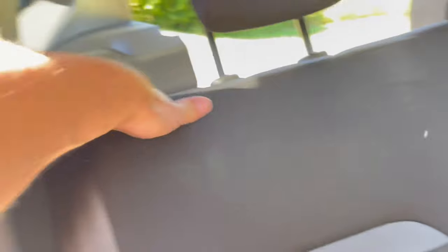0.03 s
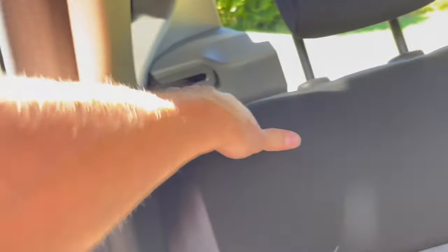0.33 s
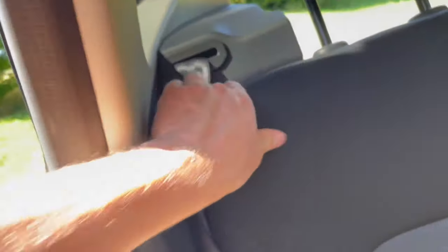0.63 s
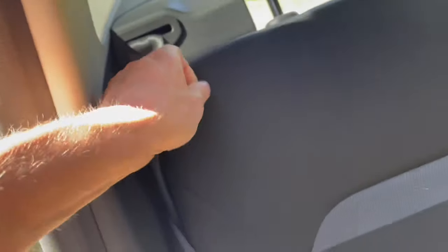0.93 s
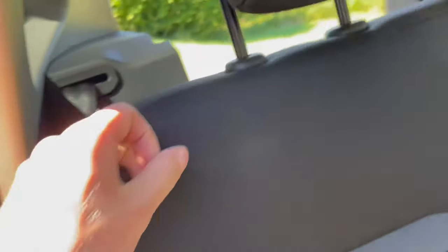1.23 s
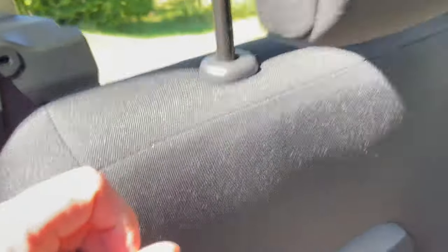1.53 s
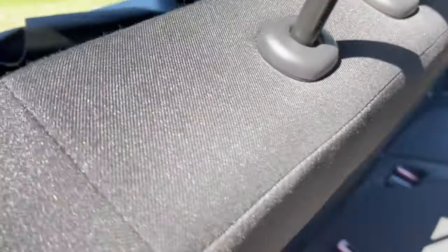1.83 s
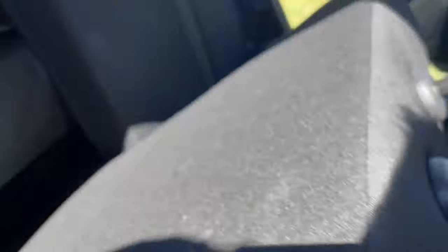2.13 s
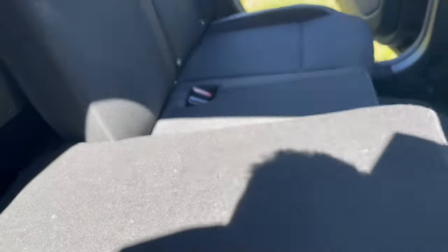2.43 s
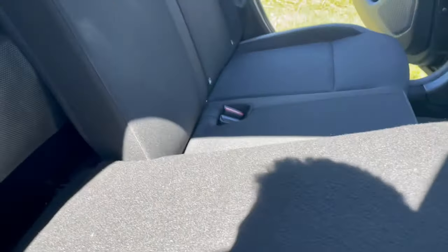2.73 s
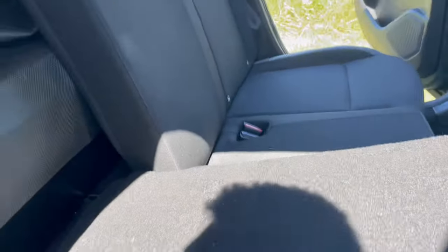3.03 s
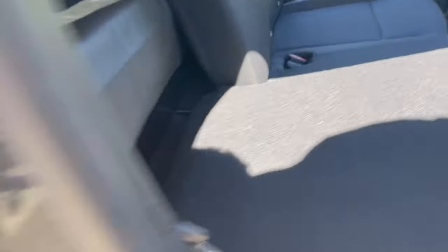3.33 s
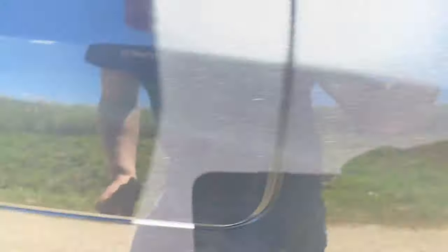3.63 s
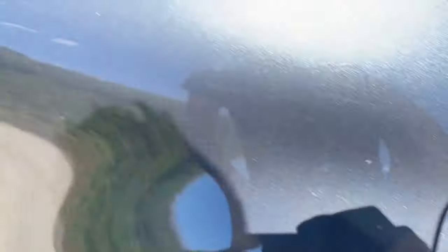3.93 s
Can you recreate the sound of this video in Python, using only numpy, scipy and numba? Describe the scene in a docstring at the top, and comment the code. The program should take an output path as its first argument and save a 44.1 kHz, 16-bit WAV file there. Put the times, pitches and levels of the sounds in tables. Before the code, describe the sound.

A car's rear seat folds down: a latch snaps open, the upholstery rubs and thuds, and the backrest lands with a plastic clack. The idling engine booms low in the cabin, and wind finally buffets the hand-held microphone.

```python
"""Rear seat folding in an idling car.

Engine firings boom in the cabin, heard from a hand-held phone. The latch snaps open, a hand and the
upholstery rub, and the backrest judders forward by stick-slip, thuds and lands with a plastic clack.
The phone moves out of the cabin: the boom fades, with small knocks and wind on the microphone."""
import sys
import numpy as np
from scipy import signal
from scipy.fft import rfft, irfft
from scipy.io import wavfile
from scipy.ndimage import uniform_filter1d
from numba import njit

SR = 44100
rng = np.random.default_rng(int(sys.argv[2]) if len(sys.argv) > 2 else 0)


def put_to_file(sound):
    """Save the sound as 16-bit audio at rate SR, in the file named by the first command-line argument."""
    columns = np.atleast_2d(sound).T  # one column per channel
    safe = np.clip(columns, -1, 1)
    whole_steps = np.round(safe * 32767)
    wavfile.write(sys.argv[1], SR, whole_steps.astype(np.int16))


N = 176400
RING_SAMPLES = 16384
TIME_S, RING_TIME_S = np.arange(N) / SR, np.arange(RING_SAMPLES) / SR


def undb(db):
    """dB to amplitude."""
    return 10 ** (np.asarray(db) / 20)


def unit(x):
    """Scale to rms 1."""
    return x / np.sqrt(np.mean(x ** 2) + 1e-18)


def pan(side_db):
    """Channel gains for a left-minus-right level."""
    return undb(np.array([[side_db], [-side_db]]) / 2)


def stereo(pair, correlation):
    """Mix two independent signals into correlated left and right."""
    mid, side = np.sqrt((1 + correlation) / 2) * pair[0], np.sqrt((1 - correlation) / 2) * pair[1]
    return np.array([mid + side, mid - side])


def wander(rate_hz):
    """Smooth random drift, rms 1."""
    step = int(SR / rate_hz)
    stairs = np.repeat(rng.standard_normal(N // step + 1), step)
    return unit(uniform_filter1d(uniform_filter1d(stairs, step), step)[:N])


def swell(start_s, rise_s, hold_s, fall_s):
    """Gaussian rise up to start_s, hold, Gaussian fall."""
    t = TIME_S - start_s
    return np.exp(-(np.minimum(t, 0) / rise_s) ** 2 / 2 - (np.maximum(t - hold_s, 0) / fall_s) ** 2 / 2)


def colour(x, spectrum, tilt_db_oct=0):
    """Filter by (Hz, dB) points and a tilt; rms 1."""
    hz, db = np.array(spectrum, float).T
    octave = np.log2(np.fft.rfftfreq(x.shape[-1], 1 / SR) + 1)
    gain_db = np.interp(octave, np.log2(hz), db) + tilt_db_oct * np.maximum(octave, np.log2(hz[0]))
    return unit(irfft(rfft(x) * undb(gain_db), x.shape[-1]))


def noise(spectrum, correlation, samples=N):
    """Coloured stereo noise, rms 1."""
    return colour(stereo(rng.standard_normal((2, samples)), correlation), spectrum)


def bandpass(x, hz, q):
    """Two-pole band-pass."""
    w = 2 * np.pi * hz / SR
    alpha = np.sin(w) / (2 * q)
    return signal.lfilter([alpha, 0, -alpha], [1 + alpha, -2 * np.cos(w), 1 - alpha], x)


@njit
def swept_bandpass(x, hz, q):
    """State-variable band-pass, retuned every sample."""
    y, band_state, low_state = np.empty(len(x)), 0., 0.
    for i in range(len(x)):
        g = np.tan(np.pi * hz[i] / SR)
        band = (band_state + g * (x[i] - low_state)) / (1 + g * (g + 1 / q))
        band_state = 2 * band - band_state
        low_state += 2 * g * band
        y[i] = band / q
    return y


def grains(rate_hz, spread_db):
    """Two random trains of uneven clicks."""
    hits = rng.random((2, N)) < rate_hz / SR
    size_db = spread_db * np.minimum(rng.exponential(size=(2, N)), 2 * np.e)
    return hits * undb(size_db) * rng.choice([-1, 1], (2, N))


def cabin(x, gain=0.097, delays_ms=(2.3, 3.7, 5.9, 8.3, 12.1)):
    """Add early reflections off glass and trim; rms 1."""
    return unit(x + sum(gain * np.roll(x, int(ms * SR / 1000), axis=-1) for ms in delays_ms))


def ring(modes, phase_spread_rad):
    """Decaying modes, each reaching the two microphones in different phases."""
    shifts = phase_spread_rad * rng.standard_normal((len(modes), 2, 1))
    out = 0
    for (hz, db, t60_s), shift in zip(modes, shifts):
        phase = 2 * np.pi * hz * RING_TIME_S + shift * np.sqrt(hz / 1000)
        out += undb(db - 60 * RING_TIME_S / t60_s) * np.sin(phase)
    return unit(out)


def place(blow, start_s, db):
    """Put a blow at start_s; db is its rms over the first 10 ms."""
    out, i = np.zeros((2, N + RING_SAMPLES)), int(start_s * SR)
    out[:, i:i + RING_SAMPLES] = blow * undb(db) / np.sqrt(np.mean(blow[:, :SR // 100] ** 2))
    return out[:, :N]


# Background spectrum: f/Hz, relative level/dB
AMBIENCE_SPECTRUM = [(20, -24), (32, -24), (50, -11), (70, -11), (98, -7.5), (125, -20), (160, -20.5),
                     (240, -26.5), (360, -26.5), (600, -31.5), (900, -37), (1400, -42.5), (3000, -52),
                     (7000, -59), (15000, -67)]
def ambience():
    """Steady wash of engine and outdoor noise."""
    return noise(AMBIENCE_SPECTRUM, correlation=0.56) * undb(-42 + 0.62 * wander(rate_hz=4.53))


# Engine orders: multiple of the firing rate, relative level/dB
ENGINE_ORDERS = [(1, -55), (2, 1), (3, -3.5), (4, -9.5), (5, -18.5), (6, -21), (7, -28.5), (8, -25)]
# Boom envelope: t/s, level/dB
BOOM_LEVEL = [(0, -34), (.4, -33), (1.1, -33.5), (2.1, -32.5), (2.9, -33), (3.4, -36), (3.65, -35.5),
              (4, -38)]
def engine(firing_hz=23.73, first_firing_s=0.03365, speed_drift=0.0011, wobble_db_per_order=0.62):
    """Idle firings boom in the cabin; higher orders are less steady."""
    drift_s = np.cumsum(speed_drift * wander(rate_hz=3.25)) / SR
    firings = firing_hz * (TIME_S - first_firing_s + drift_s)
    boom = 0
    for order, db in ENGINE_ORDERS:
        wobble_db = wobble_db_per_order * order * wander(rate_hz=12)
        boom += undb(db + wobble_db) * np.cos(2 * np.pi * order * firings)
    level_db = np.interp(TIME_S, *np.array(BOOM_LEVEL).T)
    return unit(boom) * undb(level_db) * pan(side_db=-0.042)


# Wind spectrum: f/Hz, relative level/dB
WIND_SPECTRUM = [(20, -27), (45, 4), (65, 8), (120, -1.5), (220, -20), (600, -63)]
# Gusts: t/s, rise/s, hold/s, fall/s, level/dB
GUSTS = [(3.603, 0.07, 0.097, 0.046, -35), (3.823, 0.032, 0.023, 0.031, -27.5),
         (3.956, 0.0088, 0.013, 0.016, -25.5)]
def wind():
    """Gusts rumble on the microphone."""
    envelope = sum(undb(db) * swell(*timing) for *timing, db in GUSTS)
    return noise(WIND_SPECTRUM, correlation=0.7) * envelope


# Cloth friction spectrum: f/Hz, relative level/dB
FABRIC_SPECTRUM = [(100, -10), (250, 7.5), (500, 2), (800, 1.5), (1600, 1), (2400, -0.5), (5300, -4),
                   (7000, -7), (10500, -9.5), (13000, -17), (15500, -11.5)]
def fabric(clicks, tilt_db_oct):
    """Give clicks the timbre of rubbing cloth."""
    return colour(clicks, FABRIC_SPECTRUM, tilt_db_oct)


def clothing(level_db=-63):
    """Moving cloth crackles as the phone leaves the cabin."""
    clicks = cabin(stereo(grains(rate_hz=560, spread_db=1.5), correlation=0.56))
    envelope = swell(start_s=2.5, rise_s=0.07, hold_s=0.6, fall_s=0.8)
    return undb(level_db) * envelope * fabric(clicks, tilt_db_oct=1.2)


def fibres():
    """Fibres catch and release in a dense stream of clicks."""
    return cabin(stereo(grains(rate_hz=9000, spread_db=2), correlation=0.61))


# Strokes: t/s, rise/s, hold/s, fall/s, level/dB, tilt/(dB/octave), resonance f/Hz
STROKES = [(0.013, 0.054, 0.21, 0.055, -62, 4, 1400), (0.448, 0.09, 0.065, 0.038, -51, -2, 1490),
           (0.487, 0.051, 0.06, 0.03, -60.5, 1, 5500), (0.578, 0.041, 0.067, 0.073, -44, -0.5, 1350),
           (0.694, 0.026, 0.058, 0.0038, -35, 3, 7050), (0.772, 0.036, 0.035, 0.015, -58, -1, 4300),
           (0.893, 0.023, 0.0083, 0.0082, -49.5, 0.7, 3800),
           (0.938, 0.015, 0.0095, 0.069, -54.5, 0.5, 2640), (1.176, 0.067, 0.091, 0.074, -43, 1, 1890),
           (1.428, 0.032, 0.034, 0.065, -46, 2, 4030), (1.59, 0.11, 0.12, 0.27, -52, 0.1, 4800),
           (1.603, 0.034, 0.27, 0.065, -53, -5.5, 1520), (2.133, 0.084, 0.14, 0.067, -48.5, 2, 7100),
           (2.293, 0.056, 0.024, 0.012, -39, 0, 3060), (2.355, 0.036, .15, 0.024, -51.5, -2, 1300),
           (2.595, 0.059, 0.047, 0.04, -51.5, 0, 636), (2.851, 0.054, 0.019, 0.03, -47, 1, 3540),
           (3.48, 0.091, 0.16, 0.14, -55, 0.5, 3120)]
def upholstery(flicker_db=1.03, resonance_gain=0.35):
    """Skin and cloth rub the seat; each stroke has its own brightness and resonance."""
    friction = fibres() * undb(flicker_db * wander(rate_hz=60))
    out = 0
    for *timing, db, tilt_db_oct, hz in STROKES:
        hiss = fabric(friction, tilt_db_oct)
        out += undb(db) * swell(*timing) * unit(hiss + resonance_gain * bandpass(hiss, hz, q=2.2))
    return out


# Seat cover slide: t/s, level/dB, hollow resonance f/Hz, sheen resonance f/Hz
SLIDE_PATH = [(1.1, -63, 1950, 5900), (1.3, -57.5, 1780, 5600), (1.42, -46, 1700, 5360),
              (1.54, -57, 1580, 5100), (1.65, -52, 1540, 4770), (1.82, -53.5, 1580, 4670),
              (1.95, -60, 1530, 4600), (2.1, -82, 1500, 4500)]
def cover_slide(hollow_q=6.1, sheen_q=1.9, sheen_db=2.5, flicker_db=1.03):
    """The cover rubs along the side trim; two resonances sink as the gap opens."""
    times_s, db, hollow_hz, sheen_hz = np.array(SLIDE_PATH).T
    friction = fibres()

    def resonance(path_hz, q):
        hz = np.interp(TIME_S, times_s, path_hz)
        return unit(np.array([swept_bandpass(swept_bandpass(x, hz, q), hz, q) for x in friction]))

    rub = unit(resonance(hollow_hz, hollow_q) + undb(sheen_db) * resonance(sheen_hz, sheen_q))
    level_db = np.interp(TIME_S, times_s, db, left=-np.inf, right=-np.inf)
    return rub * undb(level_db + flicker_db * wander(rate_hz=41))


# Impact noise spectrum: f/Hz, relative level/dB
CRACK_SPECTRUM = [(60, 11), (300, 13.5), (1000, 2.5), (2000, -2.5), (5800, -3.5), (7500, -8.5),
                  (11000, -11), (15000, -26)]
def crack(t60_s, correlation):
    """Dense ring of a blow in the cabin; t60_s holds at 1 kHz, lows last longer."""
    burst = noise(CRACK_SPECTRUM, correlation, RING_SAMPLES)
    out = 0
    for hz in 100 * 2. ** np.arange(8):
        band_t60_s = t60_s * (hz / 1000) ** -0.3
        out += bandpass(burst, hz, q=1.0) * undb(-60 * RING_TIME_S / band_t60_s)
    return unit(out)


# Small knocks: t/s, level/dB, f/Hz, Q, t60 at 1 kHz/s, left minus right/dB
KNOCKS = [(0.239, -49.5, 1000, 0.72, 0.025, 3), (0.853, -56, 1800, 4.4, .06, 2.5),
          (0.896, -53.5, 3850, 4.6, .06, 11), (1.485, -43.5, 3110, 23, 0.042, 4),
          (1.486, -38, 4060, 12, 0.045, 1), (0.6493, -45, 9000, 0.7, 0.01, 0),
          (1.257, -42, 2300, 1.2, 0.023, -2), (1.271, -42.5, 2400, 1.4, 0.015, -2),
          (1.449, -36.5, 1250, 1.2, 0.02, 0), (1.665, -49.5, 1150, 1.8, 0.05, 0),
          (1.765, -53, 2650, 5, 0.065, 0), (2.4, -53, 1900, 0.76, 0.02, -2),
          (2.5232, -48, 7500, 0.24, 0.013, 2), (2.523, -44, 1800, 0.72, 0.018, 0),
          (2.702, -58, 1300, 4, 0.032, 1), (2.8653, -31.5, 5340, 3.3, .025, -3),
          (3.437, -49.5, 6500, 0.4, 0.052, 2), (3.443, -36.5, 841, 1.06, 0.082, 2.5),
          (3.5201, -43, 1430, 0.42, 0.081, -1), (3.523, -53, 7100, 1.3, 0.011, 0),
          (3.547, -50, 8500, 0.45, 0.017, 0), (3.591, -46, 750, 0.79, 0.22, -5),
          (3.621, -44.5, 1450, 2.7, 0.092, -8), (3.634, -39.5, 1565, 3.6, 0.046, -2.5),
          (3.635, -37.5, 620, 3, 0.026, -1), (3.635, -52.5, 5000, 0.38, 0.045, 4),
          (3.829, -46, 1530, 1.4, 0.023, 0), (3.953, -53, 1500, 0.39, 0.051, -3)]
def knocks():
    """Trim and things outside knock, ping and tick, each in one band."""
    out = 0
    for start_s, db, hz, q, t60_s, side_db in KNOCKS:
        knock = bandpass(bandpass(crack(t60_s, correlation=0.43), hz, q), hz, q)
        out += pan(side_db) * place(knock, start_s, db)
    return out


def strike(blows, body, q, crack_db, crack_t60_s, correlation):
    """Each blow sounds the body's ring and a fresh crack, band-passed at its own frequency."""
    out = 0
    for start_s, db, hz in blows:
        blow = body + undb(crack_db) * crack(crack_t60_s, correlation)
        out += place(bandpass(blow, hz, q), start_s, db)
    return out


# Padded backrest modes: f/Hz, relative level/dB, t60/s
BACKREST_MODES = [(79.6, 4.5, 0.25), (135, -1.5, 0.096), (168.3, -2, 0.18), (188.3, -1, 0.1),
                  (233, -3, 0.17), (288, -2.5, 0.09), (326, -1.5, 0.1), (380, -1, 0.088), (427, -10, 0.15),
                  (451, -2.5, 0.089), (567.3, 1, 0.047), (848, 1, 0.022), (1079, -3, 0.05),
                  (1575, -9, 0.042)]
# Stick-slip bursts: t/s, rise/s, hold/s, fall/s, level/dB, f/Hz, Q, left minus right/dB
JUDDERS = [(0.719, 0.032, 0.036, 0.03, -34, 153, 2.2, -1),
           (0.708, 0.013, 0.014, 0.0076, -33, 474, 3.5, 3.5), (1.19, 0.016, 0.042, 0.018, -32, 180, 3.7, 0),
           (1.211, 0.037, 0.058, 0.021, -30.5, 480, 1.44, 1.5),
           (1.212, .035, 0.025, .02, -38.5, 1240, 1.4, -1), (1.364, 0.049, 0.09, 0.02, -45, 510, 4, 1.5),
           (1.4, .01, 0.016, .008, -45, 1400, 3.5, 0), (2.095, 0.022, 0.011, 0.027, -35.5, 514, 2.3, 10),
           (2.325, 0.055, .06, 0.031, -43, 467, 1.7, 4.5), (2.47, 0.036, 0.055, .01, -53, 715, 4.4, 2),
           (2.589, .01, .015, .01, -47.5, 666, 7, 2)]
def backrest_judder():
    """Stick-slip pulses ring the backrest as it drags past the side trim."""
    body = ring(BACKREST_MODES, phase_spread_rad=0.73) + undb(-9.5) * crack(t60_s=0.024, correlation=1)
    slips = grains(rate_hz=330, spread_db=1)[:1]
    drag = signal.fftconvolve(slips, body)[:, :N]
    out = 0
    for *timing, db, hz, q, side_db in JUDDERS:
        envelope = swell(*timing)
        burst = unit(bandpass(drag, hz, q) * envelope) * np.sqrt(np.mean(envelope ** 2))
        out += undb(db) * pan(side_db) * burst
    return out


# Backrest blows: t/s, level/dB, f/Hz
THUDS = [(.658, -24, 270), (.666, -23.5, 153), (.717, -26.5, 145), (1.2205, -36.5, 885),
         (1.2565, -34, 1390), (1.2705, -33.5, 905), (1.453, -28, 385), (1.519, -30, 186), (2.823, -39, 337),
         (2.89, -27.5, 122)]
def backrest_thuds():
    """Blows ring the damped modes of the padded backrest."""
    body = ring(BACKREST_MODES, phase_spread_rad=0.85)
    return strike(THUDS, body, q=2.46, crack_db=-7, crack_t60_s=0.026, correlation=0.78)


# Latch modes: f/Hz, relative level/dB, t60/s
LATCH_MODES = [(477, -9, 0.12), (549, 6.5, 0.089), (950, 1, 0.018), (1027, 1, 0.049), (1250, 8, 0.042),
               (1350, -11, 0.049), (1460, -18, 0.013), (1705, 7, 0.024), (2320, -2, .03), (2800, -11, .03),
               (3370, -12, 0.039), (4180, 3, 0.033), (5530, 0, 0.035)]
# Latch snaps: t/s, level/dB, f/Hz
SNAPS = [(.6462, -36.5, 1200), (.6496, -22.5, 2580), (.6515, -24, 1240), (.6538, -28.5, 1100),
         (.676, -35, 900), (.703, -39, 1100)]
def latch():
    """The latch springs open and rings in a quick run of snaps."""
    body = ring(LATCH_MODES, phase_spread_rad=0.39)
    return strike(SNAPS, body, q=0.62, crack_db=0, crack_t60_s=0.026, correlation=0.8)


# Seat frame and plastic trim modes: f/Hz, relative level/dB, t60/s
FRAME_MODES = [(373, 9.5, 0.066), (555, 9, 0.086), (796, 5, 0.083), (976, -5, 0.043), (1400, -2, .065),
               (1755, -3.5, .055), (2195, -13, 0.07), (2490, -2, 0.048), (2874, -5.5, 0.066),
               (3750, -10, 0.06), (4830, -2.5, .05), (5290, -5, 0.033), (5860, -10, .06), (6700, -15, .045)]
# Frame blows: t/s, level/dB, f/Hz
CLACKS = [(2.523, -43.5, 650), (2.818, -44.5, 4000), (2.8535, -33, 10200), (2.8585, -25, 800),
          (2.8618, -24, 3570), (2.8657, -28.5, 4600), (2.8662, -23, 980), (2.867, -29, 350),
          (2.872, -24.5, 620), (2.8765, -35, 2000), (2.8845, -43, 6000), (2.9215, -51, 6000)]
def landing_clack():
    """The backrest lands; a cluster of blows rings the frame and its plastic trim."""
    body = ring(FRAME_MODES, phase_spread_rad=0.39)
    return strike(CLACKS, body, q=0.56, crack_db=-2, crack_t60_s=0.047, correlation=0.4)


def scene():
    """Stereo sum of impacts, background and friction."""
    impacts = latch() + backrest_thuds() + landing_clack() + knocks()
    background = engine() + ambience() + wind()
    friction = clothing() + upholstery() + cover_slide() + backrest_judder()
    return impacts + background + friction


# Mid and side tone colour: f/Hz, mid gain/dB, side gain/dB
STEREO_COLOUR = [(20, 0, -15), (40, 0, -2), (2400, -3.5, 1.5), (4630, -4.5, -2), (6230, -4, 1),
                 (7980, -11, 6.5), (9390, -3.5, -4.5), (11900, 0, -4), (13550, -5.5, 7), (14600, -20, 8.5),
                 (16000, -7, 0)]
# Channel balance: f/Hz, left minus right/dB
BALANCE = [(500, -0.5), (1000, -3.5), (2500, 0.5), (4500, 0.9), (9000, -0.5)]
def record(dry, cutoff_hz=15850):
    """The centre dips and the sound widens near 8 and 14.6 kHz; midrange leans right; the top is cut."""
    hz, mid_db, side_db = np.array(STEREO_COLOUR, float).T
    bins_hz = np.fft.rfftfreq(2 * N, 1 / SR)
    mid = rfft((dry[0] + dry[1]) / 2, 2 * N) * undb(np.interp(bins_hz, hz, mid_db))
    side = rfft((dry[0] - dry[1]) / 2, 2 * N) * undb(np.interp(bins_hz, hz, side_db))
    lean = undb(np.interp(bins_hz, *np.array(BALANCE).T) / 2)
    heard = irfft(np.array([(mid + side) * lean, (mid - side) / lean]))[:, :N]
    return signal.sosfilt(signal.ellip(10, 0.2, 80, cutoff_hz, fs=SR, output="sos"), heard)


dry = scene()
out = record(dry)
put_to_file(out)
```